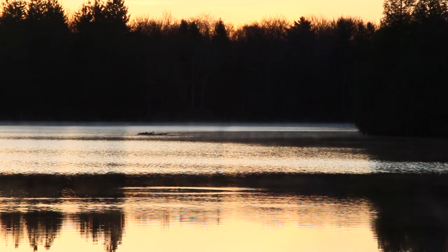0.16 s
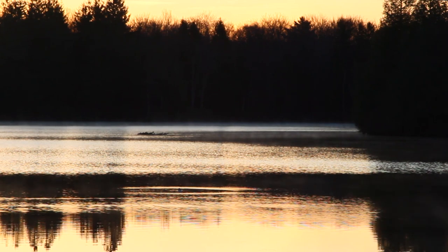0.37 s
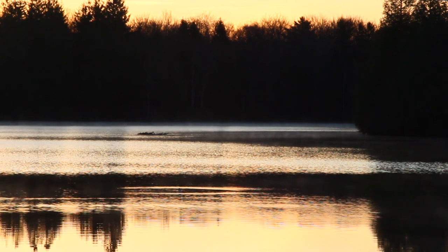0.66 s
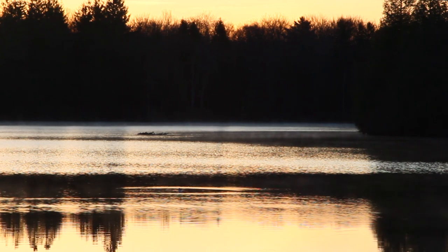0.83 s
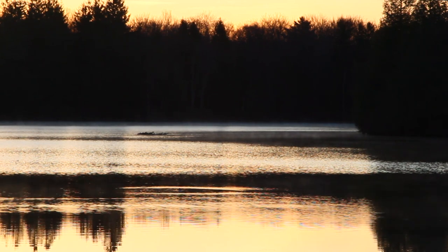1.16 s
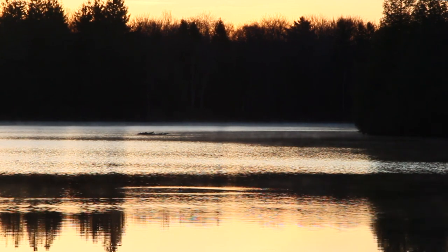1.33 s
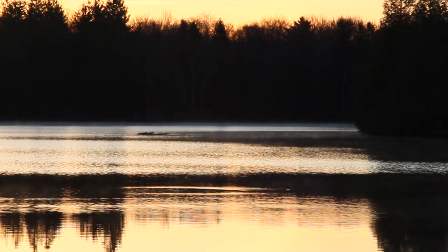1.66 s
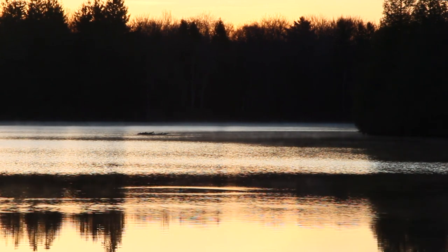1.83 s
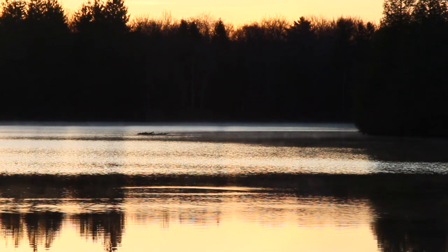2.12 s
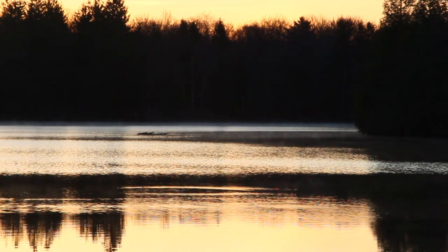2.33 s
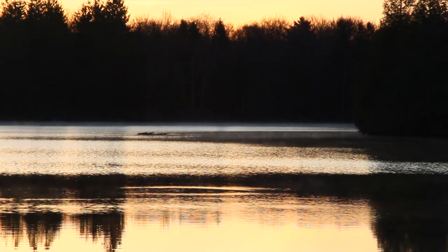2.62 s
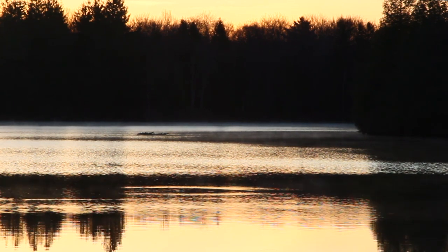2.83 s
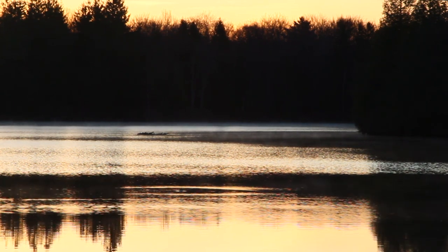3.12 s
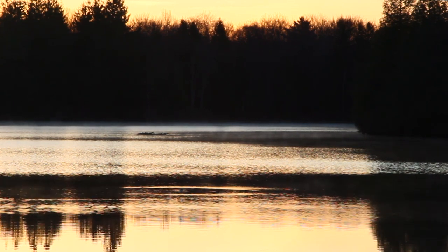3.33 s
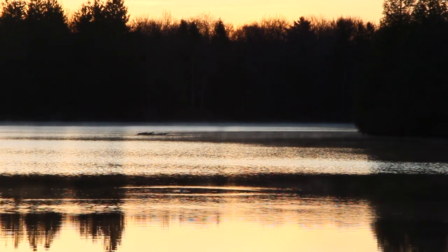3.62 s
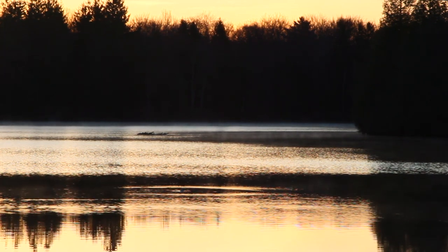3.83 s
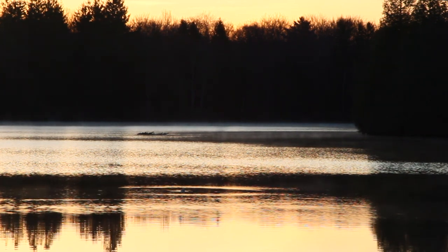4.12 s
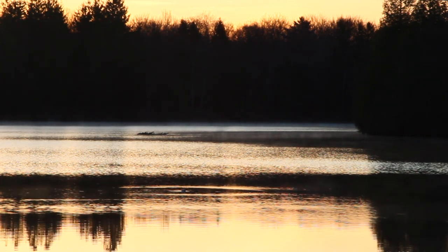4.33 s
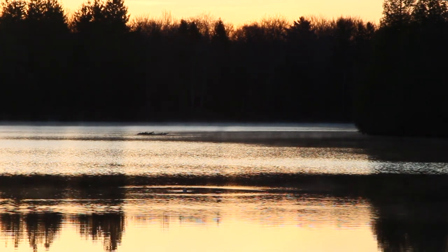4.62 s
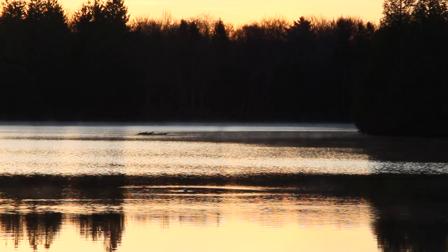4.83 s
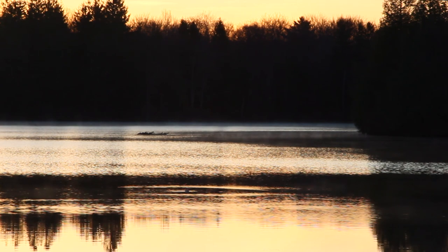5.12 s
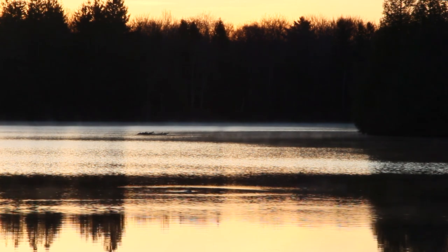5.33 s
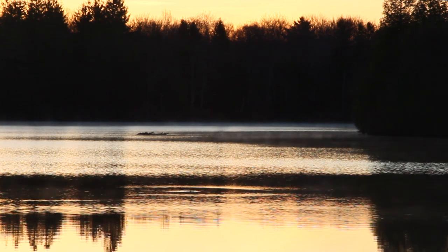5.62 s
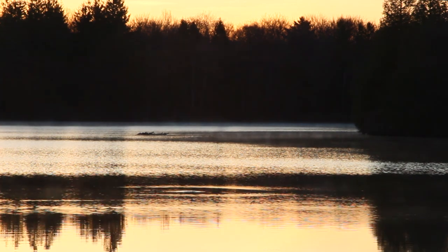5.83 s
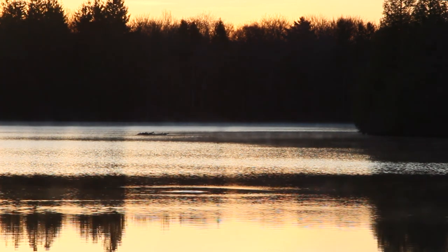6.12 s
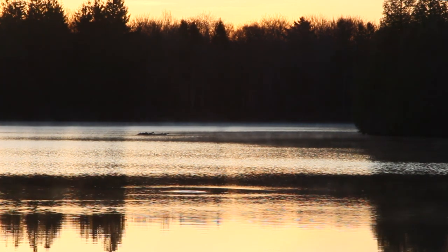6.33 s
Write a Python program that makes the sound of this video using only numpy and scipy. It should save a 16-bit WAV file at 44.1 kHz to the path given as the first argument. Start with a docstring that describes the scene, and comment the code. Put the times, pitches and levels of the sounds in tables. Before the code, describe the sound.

Many small songbirds whistle and trill over a wooded lake at dawn, then a close frog on the left begins loud paired clacks.

```python
"""A wooded lake at dawn, full of birdsong over a blur of distant singers made of shaped noise and faint slurs.
Songbirds whistle slurred notes left and right as gliding sines; two small birds trill chips from one slur each.
One bird wheezes with three fluttering voices, another scolds in chips rasped by violent pitch shaking.
A frog clacks to the left, mostly in pairs, as throbs of its vocal sac; far frogs rattle as swarms of throbs.
Sparse decaying taps give the birds and frogs a soft tail from the trees."""
import sys
import numpy as np
from scipy import signal
from scipy.io import wavfile
from scipy.ndimage import uniform_filter1d

SR = 44100
rng = np.random.default_rng(int(sys.argv[2]) if len(sys.argv) > 2 else 0)


def unload_audio(sound):
    """Save the sound as a 16-bit wav file, at the path given as the first command line argument."""
    columns = np.transpose(np.atleast_2d(sound))
    # keep every value between -1 and 1, then stretch to whole-number steps
    steps = np.round(np.clip(columns, -1, 1) * 32767)
    wavfile.write(sys.argv[1], SR, steps.astype(np.int16))


N = 285327  # length in samples

# Levels are source levels, before tapers, stereo placement and tails; lean is left minus right.
# colour of distant singers and air: (frequency [Hz], relative density [dB])
BLUR_COLOUR = [(12, -73), (20, -28), (79, -32.5), (195, -50.5), (406, -60.5), (697, -58), (935, -18.5),
               (1250, -10.5), (1720, -11), (2050, -23.5), (2550, -30), (3680, -16.5), (4700, -6.5),
               (5860, -13.5), (6960, -23.5), (9050, -38), (15300, -120)]
# swell of the distant chorus: (time [s], relative level [dB])
CHORUS_SWELL = [(0, -47.5), (1.1, -48.5), (1.4, -47.5), (2.2, -49), (3.3, -46), (3.9, -45), (4.6, -45.5),
                (4.9, -47), (5.4, -44.5), (5.8, -44.5), (6.47, -48)]
# stereo tilt of the blur before its sides are blended: (frequency [Hz], lean [dB])
BLUR_LEAN = [(60, -5), (700, -0.5), (1300, 4.5), (2500, 20.5), (4500, 22), (6500, 4.5), (8500, 3)]

# wheezy calls: (time [s], length [s], pitch [Hz], level [dB], lower voice [dB], upper voice [dB], roughness [0-1])
WHEEZE_CALLS = [(1.737, 0.22, 6800, -57.5, -9, -21.5, 0.24), (2.25, 0.2, 6760, -63, 4.5, -15.5, 0.35),
                (2.676, 0.17, 6150, -55, -28, -11.5, 0.43), (2.983, .11, 6080, -55.5, -15, -14.5, 1),
                (3.39, 0.18, 5960, -55.5, -24.5, -9.5, 0.88), (4.658, 0.082, 7600, -67.5, -5.5, -43, 0.6),
                (4.821, 0.079, 7800, -66, -14, -31.5, 0.3), (5.162, 0.093, 7940, -70, -30, -49, 0.73),
                (5.23, 0.17, 6900, -70, -21, -38, 0.3), (5.323, 0.086, 8100, -73, -38, -14, .6),
                (5.839, 0.091, 7340, -72, -34.5, -31, 0.74), (6.293, 0.15, 6740, -62, 0, -36, 0.88)]
# pitch arch of a wheeze: (position [share of call], pitch [factor])
WHEEZE_ARCH = [(0, .92), (.1, .99), (.35, 1), (.9, .95), (1, .92)]
# harsh scolding chips: (time [s], length [s], centre [Hz], level [dB], lean [dB])
SCOLD_CHIPS = [(0.222, 0.016, 4550, -44.5, 6), (0.521, 0.015, 4710, -36.5, 11),
               (0.672, 0.016, 5100, -45.5, -8.5), (1.507, 0.02, 4900, -40.5, 7),
               (2.293, 0.033, 3860, -49, 10), (2.855, 0.021, 4910, -44.5, 8.5),
               (3.279, 0.02, 4610, -41.5, 9.5), (3.859, 0.024, 3780, -52, 6.5),
               (4.591, 0.013, 3935, -43, 13.5), (4.982, 0.013, 4940, -37.5, 16.5),
               (5.577, 0.0095, 5030, -38, 10), (5.629, 0.022, 3300, -53, 10),
               (6.086, 0.011, 3610, -38.5, 13), (6.178, 0.042, 3630, -46.5, 16)]
SCOLD_SPREAD = 0.19  # share of the centre pitch

# rising trill chips: (time [s], level [dB])
RISING_CHIPS = [(1.305, -46), (1.3856, -44.5), (1.4704, -44), (1.562, -43.5), (1.641, -42), (1.7224, -42),
                (1.8067, -41.5), (1.889, -43), (1.9748, -43.5), (2.0611, -45.5), (2.1475, -44),
                (2.2584, -48)]
# slur of a rising chip: (time in chip [s], pitch [Hz])
RISING_SLUR = [(0, 3500), (.01, 3813), (0.017, 4300), (0.025, 4860)]
# slur of a falling chip: (time in chip [s], pitch [Hz])
FALLING_SLUR = [(-.004, 7460), (.003, 6000), (.007, 5600), (0.013, 4010)]
# falling chips come ever more slowly
FALL_START_S, FALL_GAP_S, FALL_SLOWING_S, FALL_COUNT, FALL_DB = 4.302, .117, .000125, 19, -46.5

# near frog's clacks: (time [s], level [dB], gap to a second clack [s], 0 = none)
FROG_CLACKS = [(.846, -46, 0), (2.042, -39, .034), (4.595, -46, 0), (4.7353, -10, 0), (4.8066, -10, 0),
               (4.8625, -10, .0454), (5.0162, -10, .0404), (5.1663, -10, .0379), (5.312, -10, .0364),
               (5.4601, -10, .0365), (5.6113, -10.5, .0354), (5.7645, -11, .0339), (5.9311, -12, .0349),
               (6.1426, -12, .0354), (6.4645, -11, 0)]
# resonances in one throb of the vocal sac: (frequency [Hz], level [dB], half-width [s])
SAC_MODES = [(1248, 0.5, 0.0015), (1574, -8.5, 0.00085), (874, -37, .0015)]
# far frogs' rattles: (time [s], length [s], strongest pitch [Hz], sharpness [Q], start level [dB], end level [dB])
FAR_RATTLES = [(-.05, .06, 1196, 17, -61, -38.5), (2.564, 0.13, 1265, 2.2, -42.5, -36.5),
               (5.511, 0.22, 1268, 2.7, -33, -38)]
SECOND_CLACK_DB = -3.5
THROB_GAP_S, THROB_DB = .00446, -6.5  # each clack throbs a second time, weaker
RATTLE_RISE_S, RATTLE_DROP_DB, RATTLE_DROP_S, RATTLE_FADE_DB_PER_S = .05, -27.5, 0.042, 47.5
GRAINS_PER_S = 1500  # mean density of throbs in a rattle

# three-note phrase: (start in phrase [s], length [s], evenly spaced pitches [Hz], early trim [dB], late trim [dB])
PHRASE_NOTES = [(0, 0.036, (5170, 5750, 5420, 4320, 3570), -4.5, -2.5),
                (0.048, 0.028, (3350, 3790, 4035, 4520, 5040), -5, 1.5),
                (.083, 0.017, (3520, 3880, 4160, 4780, 4800), -2.5, 2.5)]
# repeats of the phrase: (time [s], level [dB], pitch of the first note [factor])
PHRASE_REPEATS = [(0.022, -43.5, 1.02), (.155, -39.5, 1.01), (0.293, -39, .99), (0.428, -36.5, 1.007),
                  (0.562, -34.5, 1.01), (0.704, -35, .99), (.839, -33.5, 0.98), (.974, -34, 0.98)]
# nearest singer flicks up and swoops down:
# (time of peak [s], length [s], peak [Hz], floor [Hz], fall [s], early level [dB], late level [dB])
SWOOP_NOTES = [(3.726, 0.08, 6480, 4495, 0.021, -31, -24.5), (3.973, 0.076, 5736, 4250, 0.022, -27, -20.5),
               (4.147, 0.087, 6180, 4286, 0.021, -22, -26.5), (4.4, .082, 5990, 4307, .03, -28, -25),
               (4.612, 0.068, 5920, 3954, 0.032, -27, -30)]
# lifts to a held note: (time [s], length [s], start [Hz], held pitch [Hz], level [dB])
LIFT_NOTES = [(3.619, 0.048, 4350, 5030, -29.5), (3.806, .056, 4230, 4850, -28.5),
              (4.057, .04, 4050, 4800, -24), (4.243, .056, 4200, 4830, -25),
              (4.507, 0.049, 4250, 5350, -24)]
# jumps to a shelf, then drops off it: (time [s], length [s], overshoot [Hz], shelf [Hz], level [dB])
SHELF_NOTES = [(5.144, 0.031, 4900, 4590, -43), (5.495, 0.056, 5200, 4540, -35),
               (5.747, 0.053, 4950, 4510, -29), (5.933, 0.053, 5130, 4790, -25.5),
               (6.1, 0.062, 5130, 4555, -26.5), (6.286, 0.057, 5200, 4853, -26)]
# drooping notes further left: (time [s], length [s], top [Hz], level [dB])
DROOP_NOTES = [(5.703, 0.043, 4060, -38), (5.892, 0.033, 3920, -34), (6.059, 0.041, 3905, -36.5),
               (6.247, 0.035, 4130, -31.5), (6.433, 0.03, 3850, -35.5)]
# droop evenly along the note: pitch [factor]
DROOP_SHAPE = (1, 0.98, 1, .93, .84)
# remaining single slurs, from the nearest singer and others:
# (time [s], length [s], start [Hz], middle [Hz], end [Hz], level [dB], lean [dB])
SINGLE_SLURS = [(0.008, 0.051, 3410, 4020, 4250, -46.5, 12), (0.152, 0.044, 4940, 4600, 4200, -45.5, 10),
                (.99, 0.036, 5740, 6170, 6100, -59, -1), (2, 0.024, 6910, 6580, 6800, -48, -4.5),
                (3.689, 0.024, 3330, 3790, 4300, -58.5, 9), (4.07, 0.035, 4300, 4230, 4200, -42, -18),
                (4.205, 0.016, 3960, 3810, 3800, -40.5, 8.5), (6.219, .02, 5120, 4940, 4900, -42, 8.5),
                (6.018, 0.022, 3680, 3730, 3780, -48, 18), (0.097, 0.039, 4510, 4700, 4920, -50.5, 9),
                (1.12, 0.036, 4730, 3780, 4060, -38.5, 12), (1.157, 0.037, 4110, 4710, 4420, -40.5, 9),
                (1.209, 0.046, 4270, 3900, 2970, -49, 11.5), (1.79, 0.055, 5210, 4860, 4900, -46.5, 9),
                (2.055, .049, 4900, 4840, 4750, -46.5, 10.5), (2.1, 0.026, 4780, 4650, 4700, -37.5, 13),
                (2.245, 0.082, 5530, 5030, 4740, -43.5, 20), (2.31, 0.047, 4720, 4770, 4430, -36.5, 7.5),
                (2.429, 0.059, 5510, 4940, 4400, -42, 18.5), (2.442, 0.036, 6230, 5720, 5430, -48, 14),
                (2.488, 0.044, 5340, 4770, 4960, -43, 10.5), (2.528, 0.04, 5020, 4920, 4970, -38, 3),
                (2.604, 0.054, 5490, 5010, 4640, -40, 15.5), (2.73, 0.05, 5000, 4830, 4390, -33.5, 5),
                (2.785, 0.054, 5370, 4880, 4580, -39.5, 20), (2.827, 0.038, 4430, 4760, 4800, -40.5, 4),
                (2.948, 0.034, 3930, 4135, 3480, -37.5, 21.5), (2.981, 0.065, 3640, 3910, 4010, -37.5, 19),
                (3.032, 0.023, 4400, 4290, 3610, -35, 17.5), (3.04, 0.028, 5020, 4800, 4780, -40, 11.5),
                (3.074, 0.023, 4530, 4400, 4480, -42.5, 2), (3.122, 0.05, 5140, 5310, 5320, -47, 7),
                (3.182, 0.019, 3480, 3830, 3600, -40.5, 19), (3.232, 0.048, 3620, 4300, 4670, -44.5, 15),
                (3.288, 0.039, 4670, 4596, 4560, -38.5, 7.5), (3.367, .073, 5000, 4900, 5100, -39, 7.5),
                (3.5, 0.047, 5540, 4786, 4460, -35.5, 5), (3.539, .028, 4440, 4510, 4500, -29, 0.5),
                (3.584, 0.032, 5200, 4900, 4800, -34, -6.5), (3.86, 0.044, 4900, 4615, 4750, -24, -4.5),
                (3.859, 0.04, 5110, 5360, 5150, -41.5, 5.5), (4.03, 0.049, 5360, 5130, 5070, -49, 10),
                (4.12, .012, 5170, 4980, 4760, -36, 11), (4.124, .029, 4500, 3980, 3640, -37.5, 8),
                (4.2, 0.036, 5150, 5280, 5080, -39.5, -5), (4.298, 0.024, 4884, 4850, 5000, -30.5, -6),
                (4.31, .016, 4280, 4010, 3700, -37.5, 10), (4.38, 0.032, 5540, 5330, 5230, -41.5, -8.5),
                (4.44, 0.04, 5840, 5500, 5000, -39, -9.5), (4.481, 0.031, 4250, 3980, 3644, -36, 12.5),
                (4.557, 0.1, 5350, 5030, 5110, -42.5, -15.5), (4.565, .06, 3920, 4000, 4080, -42, 5),
                (4.654, 0.014, 5500, 5140, 5060, -38, -8.5), (4.704, 0.041, 4050, 4670, 4520, -29.5, -3.5),
                (4.716, 0.053, 4110, 4120, 4170, -42.5, 19), (4.737, 0.021, 5350, 4960, 4680, -38.5, 20),
                (4.77, 0.038, 3500, 4270, 4440, -38, 11.5), (4.799, 0.041, 4000, 4080, 3470, -38, 12),
                (4.842, 0.029, 3860, 4170, 3350, -36, 11.5), (4.902, .029, 3470, 4170, 4650, -35, 11),
                (4.901, 0.018, 5260, 5000, 4860, -40, 17), (4.954, .023, 4090, 4200, 4270, -40, 18),
                (4.973, 0.033, 3790, 3720, 3000, -47.5, 15), (4.988, 0.039, 4070, 3800, 3560, -44.5, 13),
                (5.205, 0.025, 3130, 3980, 4240, -42, 14), (5.335, .053, 4320, 4485, 4030, -40, 12.5),
                (5.399, 0.038, 3200, 4120, 3840, -43, 11.5), (5.567, 0.024, 4010, 3920, 3700, -42.5, 14),
                (5.578, .021, 4350, 5140, 4770, -48.5, 22), (5.622, 0.039, 3554, 4160, 3390, -36, 12),
                (5.676, 0.035, 5680, 4470, 4400, -39.5, 28), (5.94, 0.048, 5440, 5410, 4890, -41, 16),
                (6.064, 0.039, 5120, 4580, 4530, -36, 10), (6.112, 0.048, 5540, 5060, 5430, -38, 15),
                (6.184, 0.025, 3670, 3950, 3380, -35, 10.5), (6.242, .021, 4840, 4450, 4700, -37, 15)]
FLICK_S, FLICK_HZ, FLICK_DB, FALL_CURVE, END_DROP_HZ, END_DROP_S = .009, 3990, -7.5, 1.7, 350, .008
GRACE_S, GRACE_HZ, GRACE_DB = 0.014, (5200, 6190, 6540), -36  # the other half of the voice box leads in above
LIFT_S, LIFT_SWELL_DB, SLUR_SWELL_DB = 0.013, 1.5, 2.5
JUMP_S, SETTLE_S, DROP_S, BASE_HZ, JUMP_DB = .017, 0.0096, 0.0064, 3350, -6
DIP = 0.023  # share: pitch settles this far below the shelf and creeps as far above
MURMUR_S, MURMUR_HZ, MURMUR_DB, MURMUR_LEAN_DB = .03, (3030, 3360, 3260), -17.5, 18  # low note after each drop
WAVER, WAVER_HZ = .015, 112.7  # unsteady pitch of sung notes before smoothing: share, knots per second

PORT_LAG_S, TAPS, EDGE_HZ = 2.8e-5, 15, 9450  # right-port delay, filter half-length in samples, upper band edge


def amp(db):
    """Decibels to gain."""
    return 10 ** (np.asarray(db) / 20)


def evened(x):
    """Scales to unit rms."""
    return x / np.sqrt(np.mean(x ** 2) + 1e-20)


def read(points, x):
    """Straight lines between table rows."""
    return np.interp(x, *np.transpose(points))


def add(mix, s, sound, lean_db):
    """Mixes a sound in at time s, leaning left or right at constant total power."""
    part = mix[:, max(round(s * SR), 0):][:, :len(sound)]
    sides = amp([[lean_db / 2], [-lean_db / 2]]) / np.sqrt(np.cosh(lean_db * np.log(10) / 20))
    part += sides * sound[:part.shape[1]]


def wobble(count, hz):
    """Random drift: straight lines between normal-distributed knots, hz knots per second."""
    knots = rng.standard_normal(64)
    return np.interp(np.arange(count) * hz / SR % 63, np.arange(64), knots)


def whistle(hz, flutter_db, taper):
    """A sine along a pitch curve, tapered at its ends; moving air makes its level flutter."""
    tone = np.sqrt(2) * np.sin(2 * np.pi * np.cumsum(hz) / SR)
    flutter = amp(flutter_db * wobble(len(hz), 160))
    return tone * flutter * signal.windows.tukey(len(hz), np.clip(taper, 0, 1))


def blur():
    """Random short-time spectra with drifting patches; the singers' band swells with the chorus."""
    frames, hz = N // 128 + 5, np.fft.rfftfreq(512, 1 / SR)
    a, b, c, d, patches = rng.standard_normal((frames, 257, 5)).T
    patches = uniform_filter1d(patches, size=5, axis=0)  # across frequency
    patches = evened(uniform_filter1d(patches, size=14, axis=1))  # across time
    f, db = np.transpose(BLUR_COLOUR)
    shape = np.interp(np.log(hz + 1), np.log(f + 1), db)[:, None]
    swell = read(CHORUS_SWELL, np.arange(frames) * 128 / SR)
    follows = read([(2000, 0.059), (3200, 0.99), (6300, 1.0), (7500, 0.11)], hz)[:, None]
    lean = read(BLUR_LEAN, hz)[:, None]
    shared, private = a + 1j * b, c + 1j * d
    left = shared * amp(lean / 2)
    right = (0.17 * shared + 1.53 * private) * amp(-lean / 2)
    steady = np.array([left, right]) * amp(shape + 2.0 * patches)
    scale = np.sqrt(np.mean(signal.istft(steady, nperseg=512, noverlap=384)[1] ** 2))
    level_db = follows * (swell - swell.min()) + swell.min() - 2.0
    swelling = steady * amp(level_db) / scale
    return signal.istft(swelling, nperseg=512, noverlap=384)[1][:, :N]


def far_singers():
    """Many faint whistled slurs at random moments, following the chorus swell."""
    out = np.zeros((2, N))
    for s, pitch, slope, length, size, side in rng.random((900, 6)):
        u = np.linspace(-.5, .5, round((0.026 + 0.069 * length) * SR))
        hz = (3500 + 2100 * pitch) * (1 + 0.52 * (slope - .6) * u)
        db = read(CHORUS_SWELL, s * N / SR) - 9 - 12 * size
        add(out, s * N / SR, amp(db) * whistle(hz, 2.5, .8), 14 * side + 1.5)
    return out


def woods(x, t60, start_s):
    """Tail from the trunks: sparse taps of random sign, decaying, partly shared by both sides."""
    t = np.arange(SR) / SR
    signs = rng.choice([-1., 1.], (2, SR))
    sparse = rng.random((2, SR)) < .1
    taps = signs * sparse * amp(-60 * t / t60) * (t > start_s)
    taps[1] = 0.8 * taps[0] + 0.6 * taps[1]
    taps = taps / np.linalg.norm(taps, axis=1)[:, None]
    return signal.fftconvolve(x, taps, axes=1)[:, :N]


def wheezer():
    """Three unrelated voices on one arch, chopped by a fast flutter and roughened by pitch jitter."""
    out = np.zeros((2, N))
    for s, length, hz, db, low_db, high_db, rough in WHEEZE_CALLS:
        u = np.linspace(0, 1, round(length * SR))
        chop = 1 + .5 * np.sin(2 * np.pi * 76 * length * u)  # 76 Hz
        upper = 1.2 if hz < 6500 else 1.24
        for ratio, voice_db in ((.84, low_db), (1, 0), (upper, high_db)):
            jitter = 1 + .04 * rough * wobble(len(u), 450)
            pitch = ratio * hz * read(WHEEZE_ARCH, u) * jitter
            add(out, s, amp(db + voice_db) * chop * whistle(pitch, 2.2, 0.077), 5)
    return out


def scolder():
    """A whistle shaken so hard in pitch that it turns to a rasp."""
    out = np.zeros((2, N))
    for s, length, hz, db, lean_db in SCOLD_CHIPS:
        for side in (-1, 1):  # both halves of the voice box
            shake = .6 * np.tanh(wobble(round(length * SR), 1400))
            pitch = hz + SCOLD_SPREAD * hz * (side / 2 + shake)
            add(out, s, amp(db) * whistle(pitch, 1.1, 0.54), lean_db)
    return out


def trillers():
    """Two trills, each repeating one whistled slur as chips."""
    out, k = np.zeros((2, N)), np.arange(FALL_COUNT)
    fall_times = FALL_START_S + FALL_GAP_S * k + FALL_SLOWING_S * k ** 2
    fallers = [(s, FALL_DB) for s in fall_times]
    for chips, slur, lean_db in ((RISING_CHIPS, RISING_SLUR, 16), (fallers, FALLING_SLUR, 2.5)):
        t = np.arange(slur[0][0], slur[-1][0], 1 / SR)
        for s, db in chips:
            add(out, s + t[0], amp(db) * whistle(read(slur, t), 3.5, 1.0), lean_db)
    return out


def sac_throb():
    """One throb of the vocal sac: short bell-shaped bursts at its resonances."""
    t = np.arange(SR // 20) / SR - .005
    return sum(amp(db) * np.exp(-.5 * (t / width) ** 2) * np.cos(2 * np.pi * hz * t)
               for hz, db, width in SAC_MODES)


def near_frog(throb):
    """Each clack is a double throb of the sac, often answered by a second clack."""
    clack = throb + amp(THROB_DB) * np.roll(throb, round(THROB_GAP_S * SR))
    clack /= abs(clack).max()
    near = np.zeros((2, N))
    for s, db, gap in FROG_CLACKS:
        add(near, s - .0037, amp(db) * clack, 9.5)
        add(near, s + gap - .0037, (gap > 0) * amp(db + SECOND_CLACK_DB) * clack, 9.5)
    return near


def far_frogs(throb):
    """Rattles as dense swarms of single throbs, smeared by distance."""
    now, far = np.arange(N) / SR, 0
    swarm = rng.standard_normal((2, N)) * (rng.random(N) < GRAINS_PER_S / SR)
    swarm = np.array([swarm[0], 1.2 * swarm[0] + 1.2 * swarm[1]])
    swarm = swarm * amp([[3.5], [-6]]) / np.sqrt(GRAINS_PER_S / SR)
    for s, length, hz, sharp, start_db, end_db in FAR_RATTLES:
        end = s + length
        shape = [(s - RATTLE_RISE_S, start_db - 41.5), (s, start_db), (end, end_db),
                 (end + RATTLE_DROP_S, end_db + RATTLE_DROP_DB)]
        level = amp(read(shape, now) - RATTLE_FADE_DB_PER_S * np.maximum(now - end, 0))
        # each frog favours its own pitch
        voiced = signal.lfilter(*signal.iirpeak(hz, sharp, fs=SR), throb) + amp(-9) * throb
        voiced = voiced[None] / np.linalg.norm(voiced)
        far = far + signal.oaconvolve(swarm * level, voiced, axes=1)[:, :N]
    return far


def frogs():
    """Near clacks and far rattles from the same sac throb, each with its own tail from the trees."""
    throb = sac_throb()
    near, far = near_frog(throb), far_frogs(throb)
    return near + far + amp(-5.0) * woods(near, 0.64, 0.0055) + amp(-2.0) * woods(far, 0.95, 0.027)


def sing(mix, s, length, hz, db, lean_db):
    """One wavering note: pitches lie evenly along it, levels evenly across its middle half."""
    u = np.linspace(0, 1, round(length * SR))
    pitch = uniform_filter1d(np.interp(u, np.linspace(0, 1, len(hz)), hz), size=90, mode="nearest")
    pitch = pitch * (1 + WAVER * uniform_filter1d(wobble(len(u), WAVER_HZ), size=90))
    level = amp(np.interp(u, np.linspace(.25, .75, len(db)), db))
    add(mix, s, level * whistle(pitch, 0.21, 0.23), lean_db)


def phrases(out):
    """One bird repeats three quick slurs, retuning only the first."""
    for s, db, factor in PHRASE_REPEATS:
        for after, length, hz, early_db, late_db in PHRASE_NOTES:
            pitches = np.array(hz) * (1 if after else factor)
            sing(out, s + after, length, pitches, (db + early_db, db + late_db), 12.6)


def swoops(out):
    """The nearest singer flicks up, then its pitch decays to a floor; a high grace note leads in."""
    for s, length, peak_hz, floor_hz, fall_s, early_db, late_db in SWOOP_NOTES:
        t = np.arange(0, length, 1 / SR)
        fall = (peak_hz - floor_hz) * np.exp(-(t / fall_s) ** FALL_CURVE)
        hz = floor_hz + fall - END_DROP_HZ * np.exp((t - length) / END_DROP_S)
        sing(out, s - FLICK_S, FLICK_S + 0.0022, (FLICK_HZ, peak_hz), (early_db + FLICK_DB, early_db), -6)
        sing(out, s, length, hz, (early_db, late_db), -1.5)
        sing(out, s - GRACE_S - .002, GRACE_S, GRACE_HZ, (GRACE_DB - 13, GRACE_DB), 1.5)


def lifts(out):
    """The nearest singer's pitch eases up exponentially to a held note."""
    for s, length, start_hz, held_hz, db in LIFT_NOTES:
        hz = held_hz - (held_hz - start_hz) * np.exp(-np.arange(0, length, 1 / SR) / LIFT_S)
        sing(out, s, length, hz, (db - LIFT_SWELL_DB / 2, db + LIFT_SWELL_DB / 2), -4)


def shelves(out):
    """Another bird overshoots, settles on a shelf and drops off it; a low murmur follows."""
    for s, length, over_hz, shelf_hz, db in SHELF_NOTES:
        t = np.arange(0, length, 1 / SR)
        curve = [(0, BASE_HZ), (JUMP_S, over_hz), (JUMP_S + SETTLE_S, shelf_hz * (1 - DIP)),
                 (length - DROP_S, shelf_hz * (1 + DIP)), (length, BASE_HZ)]
        sing(out, s, length, read(curve, t), (db + JUMP_DB, db, db, db, db + 2.0), 10)
        murmur_db = db + MURMUR_DB
        sing(out, s + length + 0.0038, MURMUR_S, MURMUR_HZ, (murmur_db - 8.5, murmur_db), MURMUR_LEAN_DB)


def droops(out):
    """Notes further left sag in pitch towards their end."""
    for s, length, hz, db in DROOP_NOTES:
        sing(out, s, length, hz * np.array(DROOP_SHAPE), (db, db + 0.5), 21)


def slurs(out):
    """Single notes of various singers bend on a parabola through three pitches."""
    for s, length, start_hz, mid_hz, end_hz, db, lean_db in SINGLE_SLURS:
        u = np.linspace(-1, 1, 17)
        hz = mid_hz + (end_hz - start_hz) / 2 * u + ((start_hz + end_hz) / 2 - mid_hz) * u ** 2
        sing(out, s, length, hz, (db - SLUR_SWELL_DB / 2, db + SLUR_SWELL_DB / 2), lean_db)


def songbirds():
    """All whistled song, each kind of note from its own pitch rule."""
    out = np.zeros((2, N))
    for voice in (phrases, swoops, lifts, shelves, droops, slurs):
        voice(out)
    return out


def scene():
    """Birds with their tail among the trees, the frogs and the distant blur."""
    birds = songbirds() + trillers() + wheezer() + scolder()
    far = far_singers()
    wet = birds + amp(-16.5) * birds[::-1]  # a little of each side crosses over
    near_birds = birds + amp(-10.0) * woods(wet, 0.35, 0.0027)
    far_birds = far + amp(-14.5) * woods(far, 0.97, 0.0011)
    return near_birds + far_birds + frogs() + blur()


def record(dry):
    """The right port answers slightly later; then the band limit."""
    late = np.sinc(np.arange(-TAPS, TAPS + 1) - PORT_LAG_S * SR) * np.hanning(2 * TAPS + 1)
    ports = np.array([dry[0], np.convolve(dry[1], late, "same")])
    band = signal.firwin(511, EDGE_HZ, window=("kaiser", 9), fs=SR)
    return signal.oaconvolve(ports, band[None], "same")


dry = scene()
out = record(dry)
unload_audio(out)
```